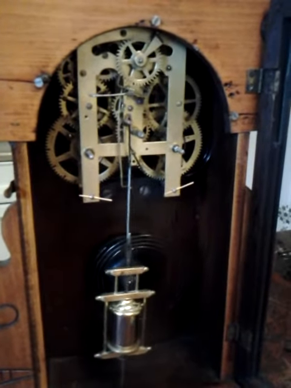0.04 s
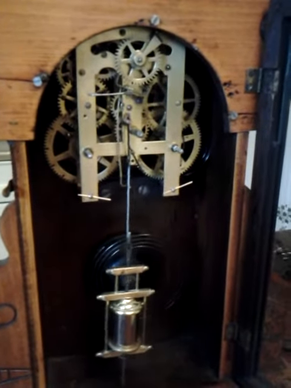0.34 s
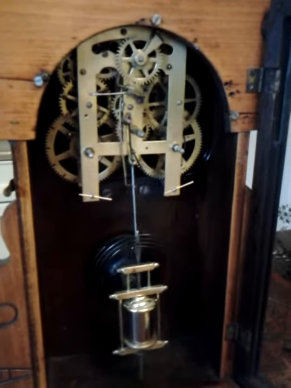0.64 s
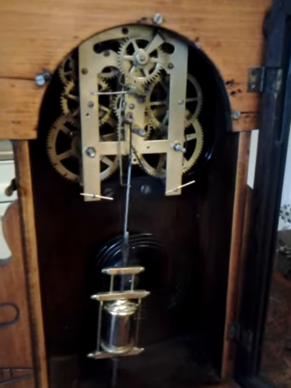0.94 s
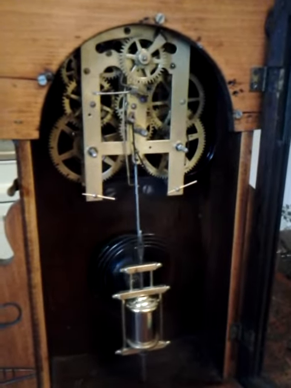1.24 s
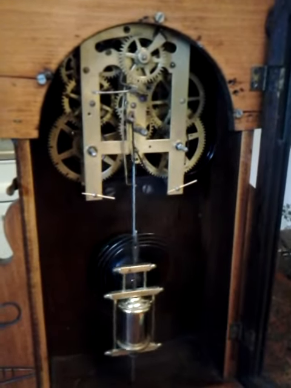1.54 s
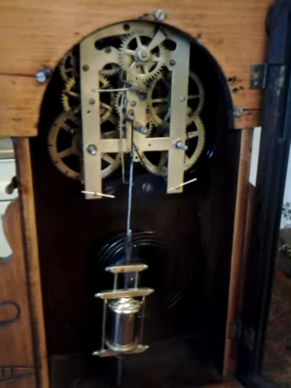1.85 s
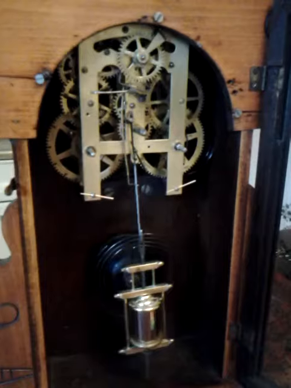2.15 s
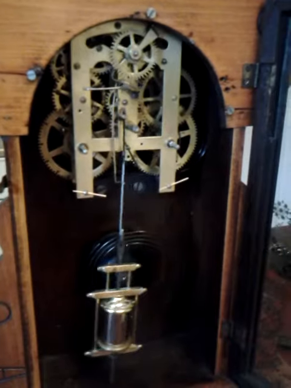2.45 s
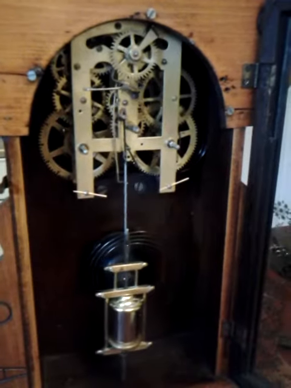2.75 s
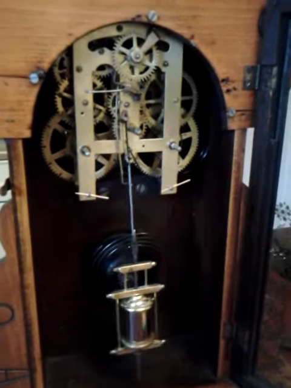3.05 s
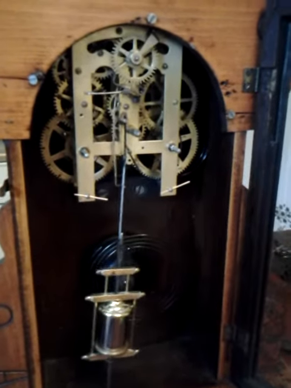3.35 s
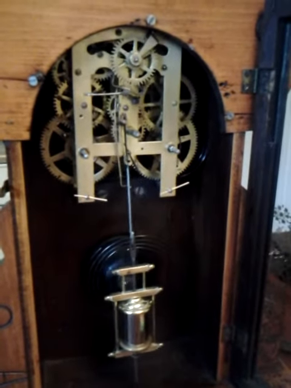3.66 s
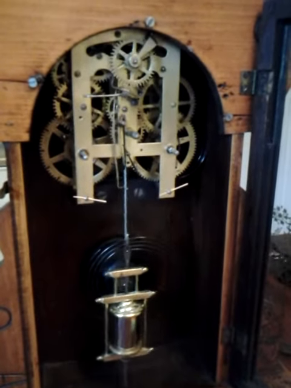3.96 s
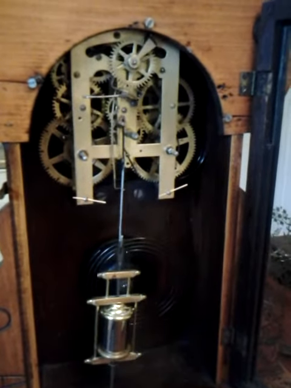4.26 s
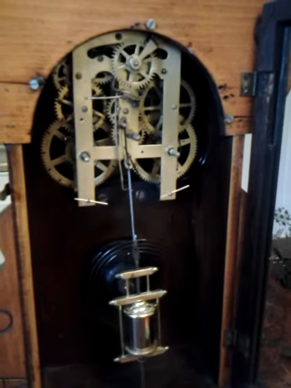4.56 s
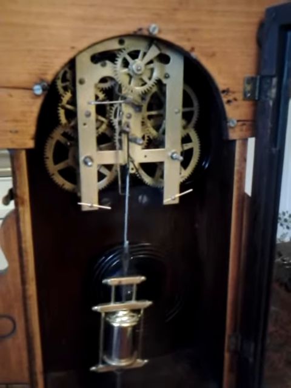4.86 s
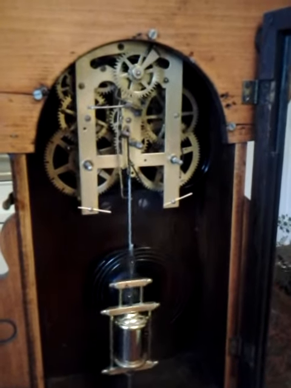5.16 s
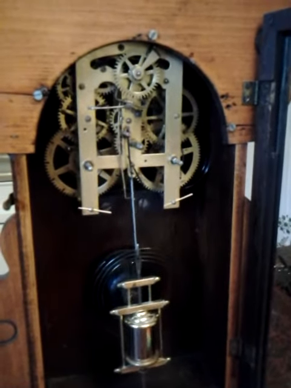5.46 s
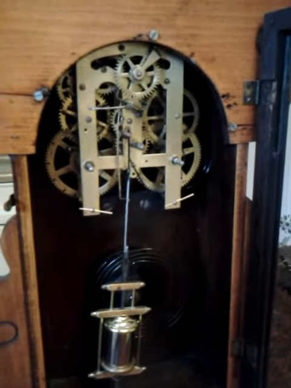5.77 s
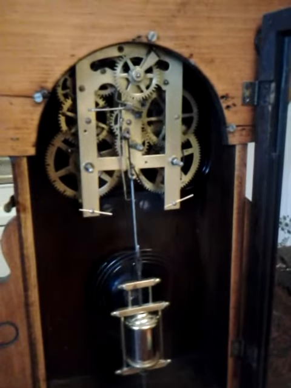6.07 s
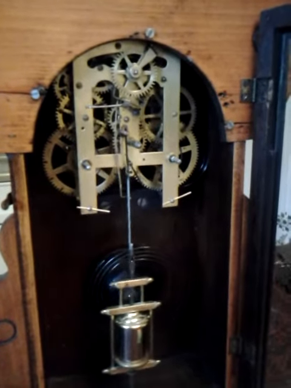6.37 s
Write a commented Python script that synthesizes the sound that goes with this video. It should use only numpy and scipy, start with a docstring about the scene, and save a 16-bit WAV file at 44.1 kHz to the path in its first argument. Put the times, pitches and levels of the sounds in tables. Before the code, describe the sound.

Mechanical clock ticking, a little over twice a second, over faint hiss and hum, interrupted once by a close knock.

```python
"""Hiss, faint crackle and the hum of a distant motor fill a quiet room. From the start an old pendulum
clock, its door open, ticks a little out of beat: the escape wheel drops on the two pallets in turn, and
each drop rattles the brass movement, knocks in the wooden case and keeps the coiled gong faintly humming.
Two tiny clicks come near 2.4 s. Near 3.3 s one sharp knock sounds close to the microphone,
and the clock ticks on to the end."""
import sys
import numpy as np
from scipy import signal
from scipy.fft import rfft, irfft, next_fast_len
from scipy.io import wavfile

SR = 44100
rng = np.random.default_rng(int(sys.argv[2]) if len(sys.argv) > 2 else 0)


def inscribe(sig):
    """Save sig as 16-bit PCM at rate SR to the path in sys.argv[1].

    A 1-D sig is mono; a 2-D sig holds one channel per row.
    Samples are clipped to [-1, 1] before scaling.
    """
    pcm = np.round(np.clip(np.atleast_2d(sig).T, -1, 1) * 32767)
    wavfile.write(sys.argv[1], SR, pcm.astype(np.int16))


N = 283122
TOP_HZ = 15800  # upper band limit


def amp(db):
    """Decibels as an amplitude ratio."""
    return 10 ** (np.asarray(db) / 20)


def unit(x):
    """Normalisation to an rms of one."""
    return x / np.sqrt(np.mean(x ** 2) + 1e-20)


def along(points, hz):
    """Interpolation of (Hz, value) points on a logarithmic frequency axis."""
    freqs, values = np.transpose(points)
    return np.interp(np.log(hz + 1), np.log(freqs + 1), values)


def add(track, s, sound):
    """Superposition: a sound joins the track at s seconds."""
    part = track[round(s * SR):][:len(sound)]
    part += sound[:len(part)]


def filtered(x, response):
    """Zero-phase filtering: the spectrum of x is multiplied by a gain over frequency."""
    size = next_fast_len(len(x) + SR // 4)
    return irfft(rfft(x, size) * response(np.fft.rfftfreq(size, 1 / SR)), size)[:len(x)]


def struck(response, size=8192):
    """Minimum phase: the causal impulse response of a body with the given gain."""
    gain = response(np.fft.rfftfreq(size, 1 / SR))
    cepstrum = irfft(np.log(np.maximum(gain, 1e-6)))
    cepstrum[1:size // 2] *= 2
    cepstrum[size // 2 + 1:] = 0
    return irfft(np.exp(rfft(cepstrum)))


def air(rms_db=-57.0):
    """Stationary coloured noise: the murmur of room air and the microphone's hiss."""
    # Noise spectrum. Each row: frequency in Hz, relative density in dB.
    density = [(25, -21), (80, -17.5), (140, -12), (200, -4.5), (245, 2), (400, 0.5), (900, -4), (1400, -5),
               (2000, -12), (4000, -14), (5700, -19), (7300, -10.5), (8500, -15.5), (12000, -15),
               (15300, -8.5)]
    noise = filtered(rng.standard_normal(N), lambda hz: amp(along(density, hz)) * (hz < TOP_HZ))
    return amp(rms_db) * unit(noise)


def whine(hz=15000, rms_db=-81):
    """A pure tone, thin and steady, at the top of the hiss."""
    return amp(rms_db) * unit(np.sin(2 * np.pi * hz * np.arange(N) / SR))


def motor(shaft_hz=58.832, drift_hz=0.0032, gain_db=0.2, knots=8):
    """Harmonic series: a distant motor hums on whole multiples of its barely drifting shaft speed."""
    # Lines of the hum. Each row: multiple of the shaft speed, level in dB.
    harmonics = [(4, -76), (5, -73), (6, -71), (8, -78), (10, -75), (12, -81), (14, -81), (17, -84),
                 (19, -77), (27, -85), (28, -80), (40, -86), (53, -80), (55, -80), (56, -85), (57, -84),
                 (58, -85), (59, -85), (67, -89), (69, -92), (70, -83), (71, -83), (72, -87), (73, -85),
                 (75, -88), (78, -82), (80, -95)]
    drift = np.interp(np.arange(N), np.linspace(0, N, knots), rng.standard_normal(knots))
    angle = 2 * np.pi * np.cumsum(shaft_hz + drift_hz * drift) / SR
    hum = sum(amp(db) * np.sin(round(k) * angle + 2 * np.pi * rng.random()) for k, db in harmonics)
    return amp(gain_db) * np.sqrt(2) * hum


def crackle(count=42, faint_db=-31, spread_db=1.5, click_gain_db=4, low_cut_hz=3500):
    """Filtered impulses: two small dry clicks, and a faint bright crackle at random times."""
    # The two clicks. Each row: start in seconds, level in dB.
    click_events = [(2.4263, -31), (2.4424, -24.5)]
    # Colour of the crackle. Each row: frequency in Hz, gain in dB.
    colour = [(2000, -22), (4500, -9), (7000, 0), (10000, 0), (12000, -7), (15000, -2)]
    clicks, faint = np.zeros(N), np.zeros(N)
    for s, db in click_events:
        add(clicks, s, amp([db + click_gain_db]))
    for when, size in rng.random((count, 2)):
        add(faint, when * (N - 1) / SR, amp([faint_db + spread_db * (2 * size - 1)]))
    clicks = filtered(clicks, lambda hz: hz ** 2 / (hz ** 2 + low_cut_hz ** 2))
    return clicks + filtered(faint, lambda hz: amp(along(colour, hz)))


def room():
    """Diffuse reverberation: a noise tail decays exponentially, each band at its own rate."""
    # Reverberation time. Each row: frequency in Hz, time to fall 60 dB in seconds.
    t60 = [(300, 0.055), (1000, 0.58), (3200, 0.54), (7000, 0.51), (14000, 0.45)]
    # The room's share. Each row: frequency in Hz, gain in dB.
    share = [(300, 2.5), (600, 4.5), (1200, -11.5), (2200, 0), (3200, -8.5), (4300, -4), (7000, -13.5),
             (10000, -4), (14000, -12)]
    hz, t, noise = signal.stft(rng.standard_normal(SR // 2), SR, nperseg=256)
    fade = np.exp(-np.log(1000) * t / along(t60, hz)[:, None])
    fade *= amp(along(share, hz))[:, None] / np.sqrt(np.mean(fade ** 2, axis=1, keepdims=True) * SR / 2)
    tail = signal.istft(noise * fade, SR, nperseg=256)[1]
    return tail * (1 - np.exp(-np.arange(len(tail)) / SR / 0.00096))


def knock(at_s=3.2666, level_db=-6.5, room_db=-21, brush_db=-24, brush_s=0.0063, soft_hz=4200):
    """Impact at close range: a light brush, then one hard push whose direct sound outweighs the room."""
    # Dull body of the knock. Each row: frequency in Hz, relative level in dB.
    colour = [(40, -58), (100, -45), (200, -22.5), (280, -11.5), (500, -7), (680, 2.5), (800, -2), (960, 1),
              (1300, -13), (2100, -18.5), (3000, -26), (4000, -34), (5500, -45), (16000, -50)]
    out = np.zeros(N)
    push = struck(lambda hz: amp(along(colour, hz)))
    push = amp(level_db) * push / np.abs(push).max()
    add(out, at_s, push + amp(room_db) * signal.fftconvolve(push, room())[:len(push)])
    brush = rng.standard_normal(round(brush_s * SR))
    add(out, at_s - brush_s, amp(brush_db) * signal.fftconvolve(brush / np.linalg.norm(brush), push))
    return filtered(out, lambda hz: np.exp(-(hz / soft_hz) ** 2))  # a soft contact rounds the edge


def gong(pallet, scatter_db=2.5, detune_hz=1.1, rise_s=0.015):
    """Free vibration: each drop shakes gong and springs to new strengths, and close modes beat."""
    # Each row: frequency in Hz, time to fall 60 dB in seconds, tick level in dB, tock level in dB.
    modes = [(168, 3.4, -8, -8.5), (3110, 0.47, 6, 1), (3146, 0.59, 5, 6), (3170, 0.54, 4, 1),
             (3220, 0.49, 4, 7), (3290, 0.6, 4, -3), (3570, 0.57, 6.5, -5), (3610, 0.59, 5, 0),
             (5220, .35, 1, -3), (5375, .35, -1, -5)]
    t = np.arange(2 * SR) / SR
    ring = np.zeros(len(t))
    for hz, t60, *levels in modes:
        envelope = amp(levels[pallet] + scatter_db * rng.normal()) * np.exp(-np.log(1000) * t / t60)
        ring += envelope * np.sin(2 * np.pi * (hz + detune_hz * rng.normal()) * t)
    return ring * (1 - np.exp(-t / rise_s))


def body_gain(hz, pallet, floor_db=-27, low_cut_hz=250):
    """Resonance: the peaks of case and movement add in power, struck at pallet 0 (tick) or 1 (tock)."""
    # Each row: centre in Hz, width in Hz, tick level in dB, tock level in dB.
    resonances = [(546, 91, -4.5, -2), (674, 28, -2.5, -6.5), (755, 82, -4, -11), (935, 69, 3, -0.5),
                  (1264, 208, 2, -2), (1395, 58, -11, -2.5), (1550, 46, -16, -10.5),
                  (1750, 175, -7.5, -7.5), (2290, 200, -20.5, -16.5), (2552, 77, -6.5, -10),
                  (2696, 134, -7, -6.5), (2923, 43, -7, -6), (3160, 110, 4.5, 0.5), (3410, 180, -6, -32),
                  (3618, 53, -6, -8), (3890, 110, -16, -14), (4370, 750, -12.5, -18),
                  (5350, 570, -7.5, -14), (5970, 260, -8, -13.5), (6580, 320, -8, -9), (7060, 173, 2.5, -4),
                  (7490, 190, -1.5, -6), (7880, 620, -8.5, -12.5), (8780, 150, -12, -10.5),
                  (9220, 240, -13, -16.5), (13930, 450, -11.5, -18), (15100, 700, -19, -16)]
    power = sum(amp(levels[pallet]) ** 2 / (1 + ((hz - centre) / width * 1.536) ** 2) ** 2
                for centre, width, *levels in resonances)
    return np.sqrt(power + amp(floor_db) ** 2) * hz ** 2 / (hz ** 2 + low_cut_hz ** 2)


def drop_gain(hz, force_db, s, dull_db_per_s=0.8, dull_above_hz=9900):
    """Impact hardness: a harder drop is brighter, as the brass follows the force and the wood hardly."""
    # Each row: frequency in Hz, gain at a usual drop in dB, change in dB per dB of force.
    hardness = [(1110, -0.04, -0.13), (3200, 1.5, 0.8), (7000, 2, 0.95), (14000, 8, 0.2)]
    levels = [(centre, db + slope * force_db) for centre, db, slope in hardness]
    dulling_db = dull_db_per_s * s * hz ** 8 / (hz ** 8 + dull_above_hz ** 8)  # the top slowly dulls
    return amp(along(levels, hz) - dulling_db)


def rattle(jolts, band_count=14):
    """Multiple scattering: a blow spreads through wheels and plates, each band at its own pace."""
    # Build-up, latest in the wood. Each row: frequency in Hz, rise time in seconds.
    rise = [(500, 0.0041), (1200, 0.0027), (3200, 0.0014), (7000, 0.00086), (14000, 0.00083)]
    # Decay of the rattle. Each row: frequency in Hz, time to fall 60 dB in seconds.
    t60 = [(500, 0.058), (1200, 0.034), (3200, 0.039), (7000, 0.037), (14000, 0.041)]
    t, hz = np.arange(len(jolts)) / SR, np.fft.rfftfreq(len(jolts), 1 / SR)
    centres = np.geomspace(300, 16000, band_count)
    bands = np.array([along(np.c_[centres, row], hz) for row in np.eye(band_count)])
    swell = 1 - np.exp(-(t / along(rise, centres)[:, None]) ** 2)
    fade = np.exp(-np.log(1000) * t / along(t60, centres)[:, None])
    spectrum = rfft(np.sum(swell * fade * irfft(bands * rfft(jolts)), axis=0))
    # scattering spreads the blow in time but leaves its colour even
    return irfft(spectrum / np.abs(spectrum))[:len(jolts) // 2]


def clock(beat_db=3, gong_db=-69, size=4096):
    """Impulse excitation: each tooth lands on a pallet, the movement rattles, room and gong answer."""
    # Escapement drops, tick and tock in turn; uneven teeth make each early or late, hard or soft.
    # Each row: time in seconds, relative force in dB.
    drops = [(0.0636, 1.9), (0.4875, 1.5), (0.8615, 0.5), (1.2987, 2.6), (1.6834, .3), (2.1214, 0.7),
             (2.4762, -1.2), (2.9282, -0.1), (3.2899, 2.2), (3.7082, -2.5), (4.1556, -0.5), (4.5129, 1),
             (4.9162, -.6), (5.2875, -2.6), (5.7546, -1.1), (6.0878, 1.5)]
    out = np.zeros(N)
    paths = rng.standard_normal((2, size))  # each pallet has its own way into the plates
    for k, (s, force_db) in enumerate(drops):
        pallet = k % 2
        response = struck(lambda hz: body_gain(hz, pallet) * drop_gain(hz, force_db, s))
        jolts = paths[pallet] + rng.standard_normal(size)  # no two teeth land alike
        beat = amp(beat_db) * signal.fftconvolve(rattle(jolts), response)
        start = s - .0008  # the tooth touches just before the rattle peaks
        add(out, start, beat)
        add(out, start, signal.fftconvolve(beat, room()))
        add(out, s, amp(gong_db + force_db) * gong(pallet))
    return out


def scene():
    """Superposition: the pressures of all sources add in one channel."""
    return (clock() + knock() + crackle() + air() + motor() + whine())[None]


def record(dry):
    """Band limiting: nothing above TOP_HZ passes."""
    return np.array([filtered(channel, lambda hz: hz < TOP_HZ) for channel in dry])


dry = scene()
out = record(dry)
inscribe(out)
```